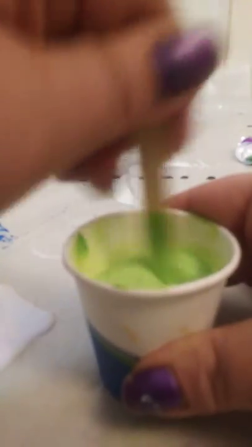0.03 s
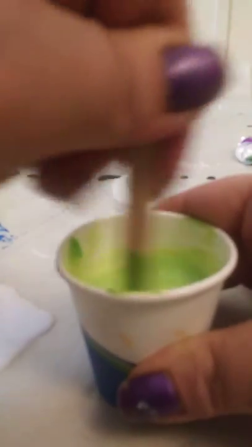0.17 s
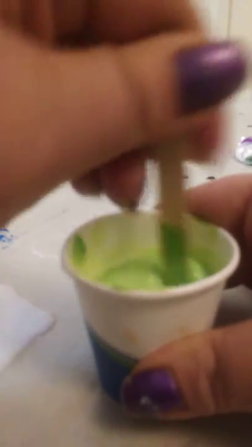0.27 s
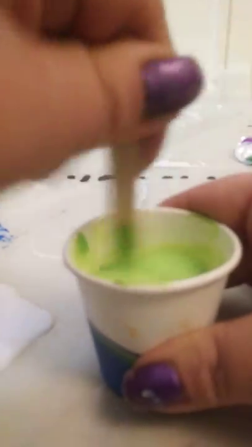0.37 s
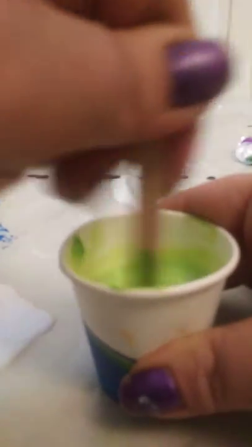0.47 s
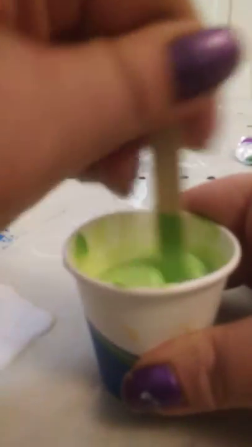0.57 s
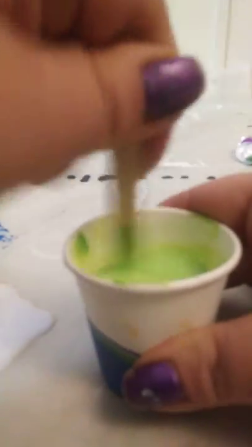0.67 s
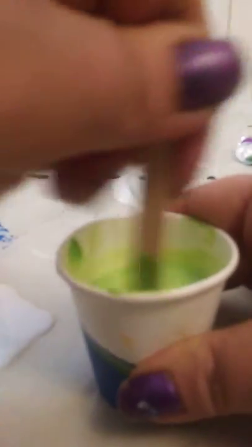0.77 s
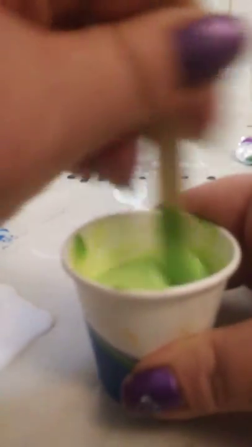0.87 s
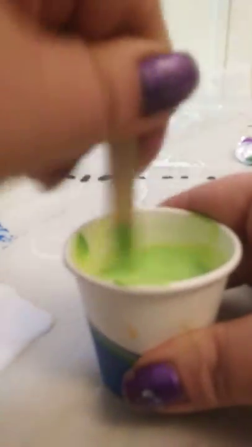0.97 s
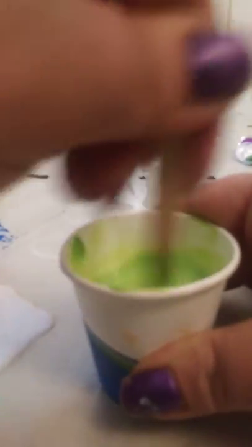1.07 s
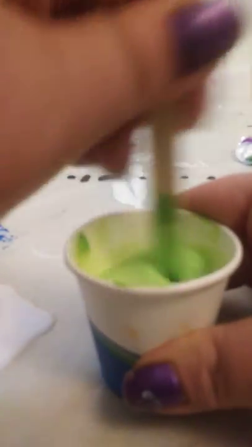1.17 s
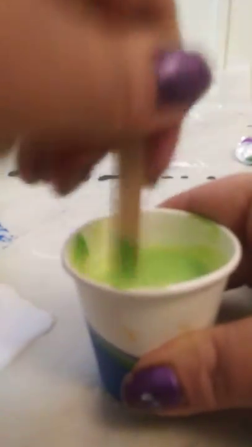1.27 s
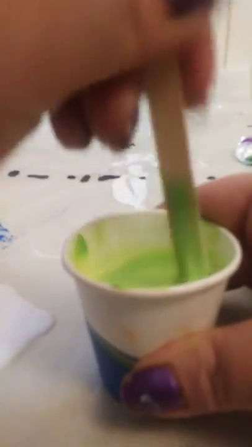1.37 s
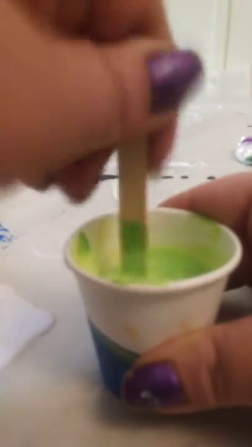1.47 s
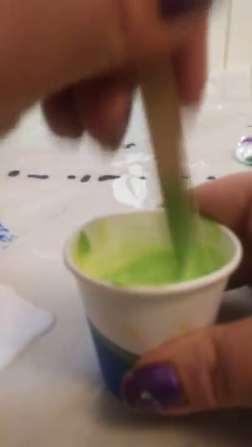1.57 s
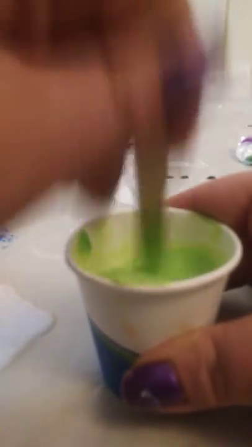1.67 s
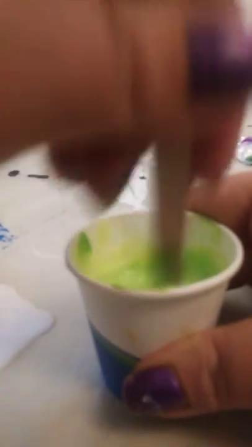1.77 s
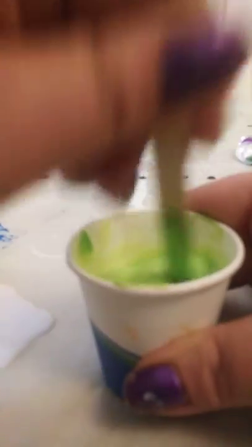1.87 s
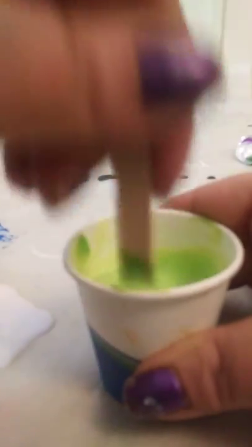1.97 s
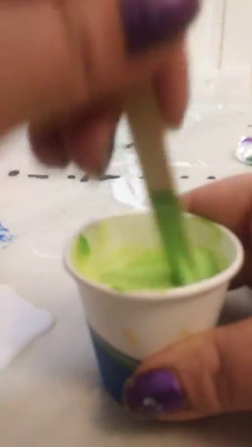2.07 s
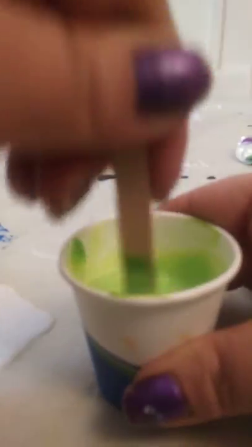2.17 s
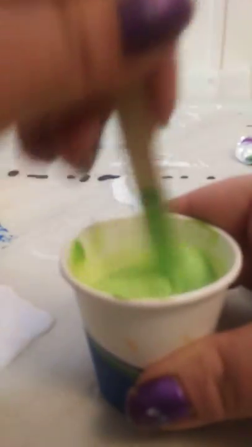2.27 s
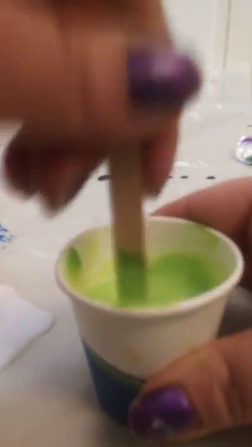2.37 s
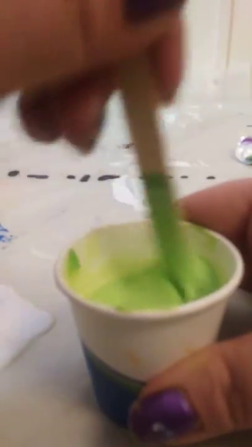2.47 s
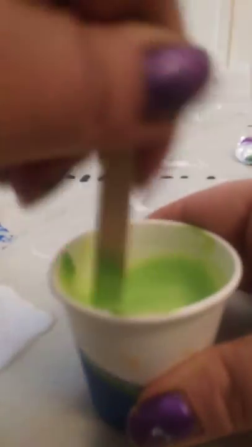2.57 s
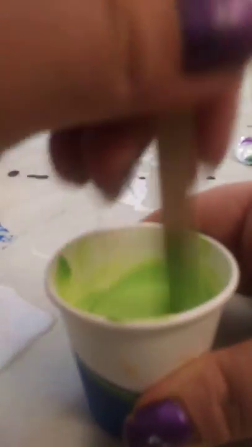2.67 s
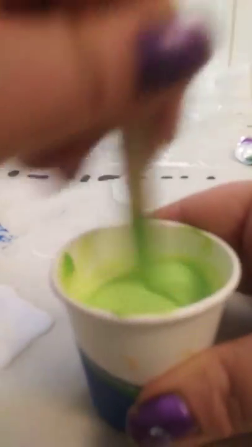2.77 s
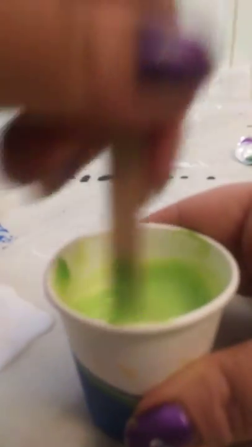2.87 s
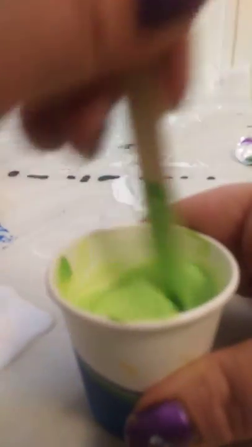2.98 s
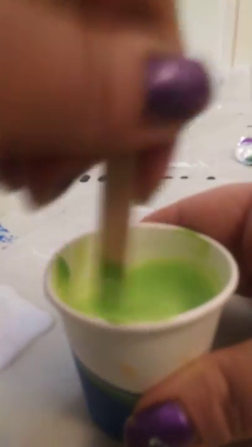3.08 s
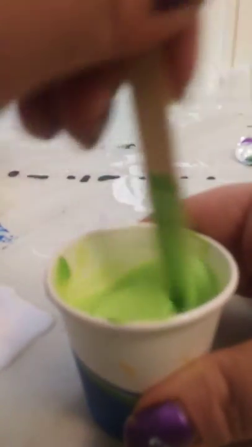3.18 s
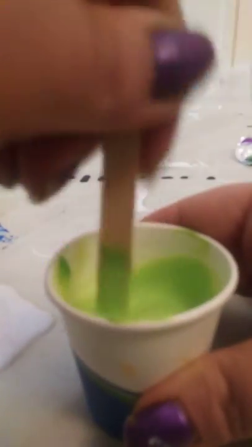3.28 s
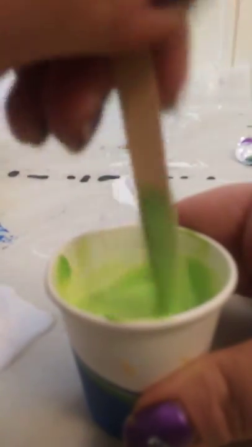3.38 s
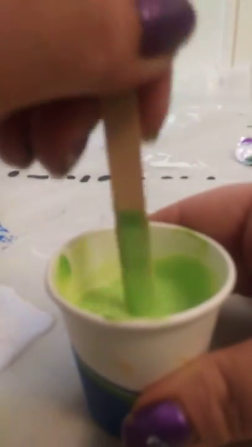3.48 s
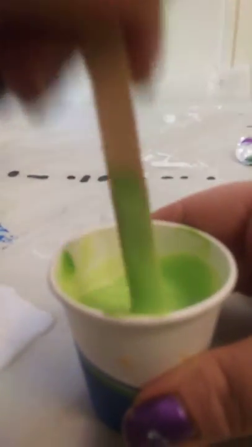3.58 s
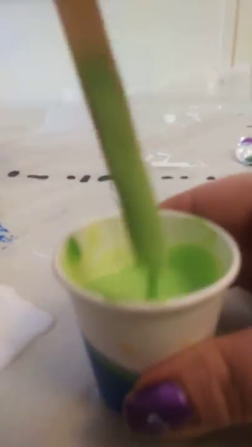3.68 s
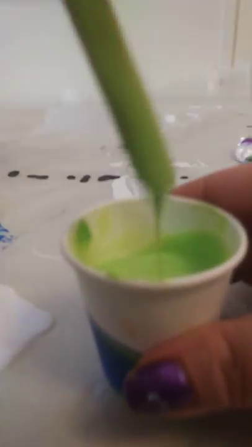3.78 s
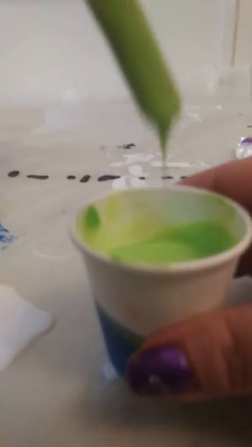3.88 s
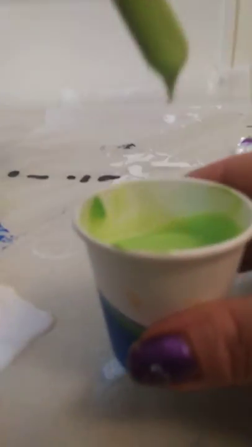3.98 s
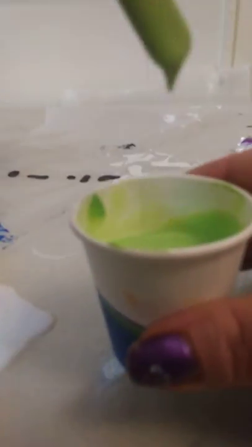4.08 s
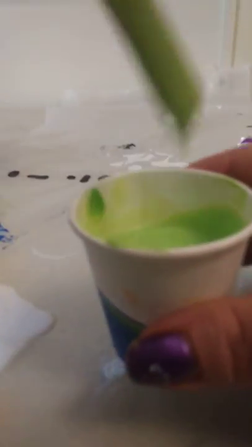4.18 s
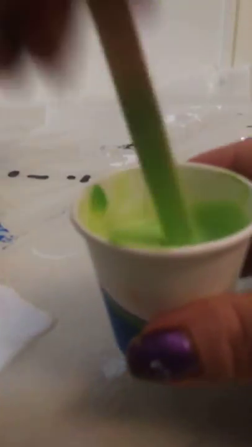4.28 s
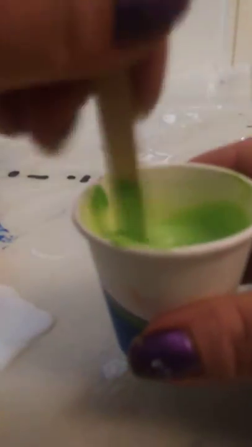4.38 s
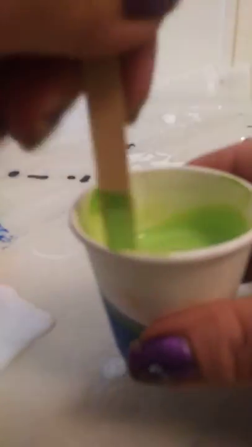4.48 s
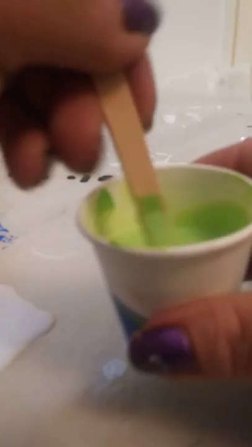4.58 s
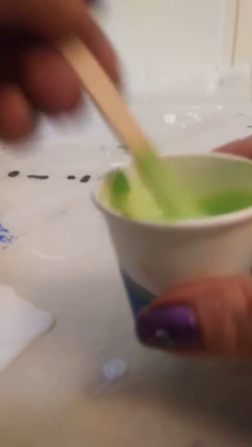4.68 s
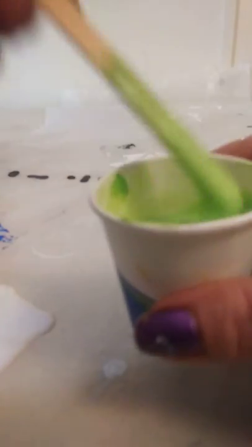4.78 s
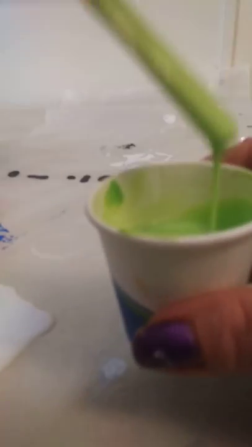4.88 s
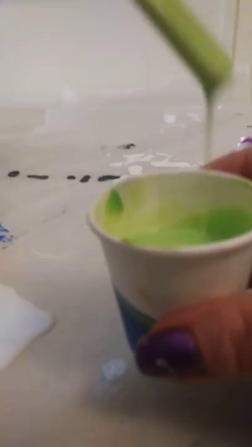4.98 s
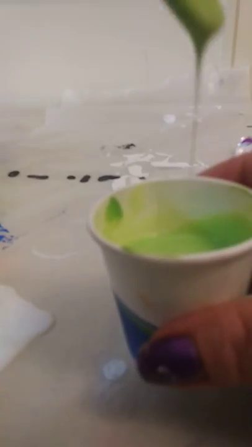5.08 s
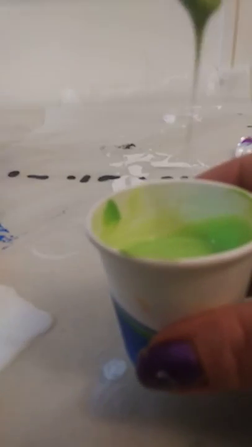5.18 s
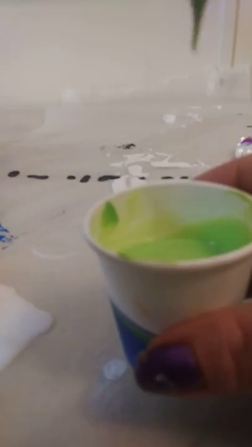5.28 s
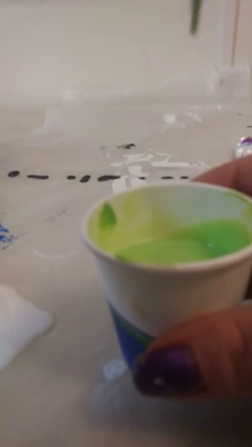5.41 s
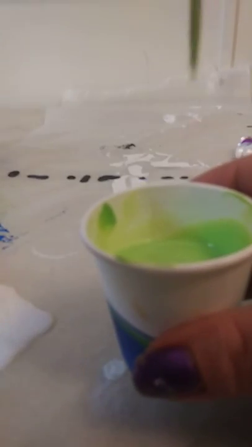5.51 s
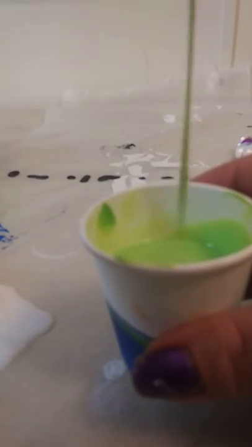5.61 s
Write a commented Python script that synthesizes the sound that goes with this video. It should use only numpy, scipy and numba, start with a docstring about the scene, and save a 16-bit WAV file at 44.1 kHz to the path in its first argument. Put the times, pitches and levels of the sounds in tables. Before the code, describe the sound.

Rapid, uneven scratching of wood on waxy paper, several strokes each second, with papery thumps as the stick hits the cup. Soft sticky crackle lies beneath. The stirring stops after three seconds; a weak rasp follows around four and a half, then only faint taps and a low steady room hush. Close, dry, mono, little bass.

```python
"""In a quiet room, close to the microphone, a wooden stick stirs thick paint in a small paper cup.
Friction, built from dense random slips, grates along the wall and bites, driving the ring of stick, wall and bottom.
Knocks are short bursts through the same stick and wall, each with a low thump of the whole cup.
The paint crackles and plops as decaying sines over a soft smear; later the stick is wiped over the rim.
Fingers slide on the paper as filtered friction; reflections and steady room air surround it all."""
import sys
import numpy as np
from scipy import signal
from scipy.fft import rfft, irfft
from scipy.io import wavfile
from scipy.ndimage import uniform_filter1d
from numba import njit

SR = 44100
rng = np.random.default_rng(int(sys.argv[2]) if len(sys.argv) > 2 else 0)


def file_out(sig):
    """Save sig as 16-bit WAV at sys.argv[1]."""
    # one column per channel
    cols = np.atleast_2d(sig).T
    # limit, then scale
    lim = np.clip(cols, -1, 1)
    pcm = np.round(lim * 32767).astype(np.int16)
    wavfile.write(sys.argv[1], SR, pcm)


N = 249165
TIME = np.arange(N) / SR  # s
EDGE_S = 0.004  # rounding of the tip's contacts, s


# resonances of the cup's bottom: (frequency [Hz], width [Hz], relative level [dB])
BOTTOM_MODES = [(213, 50, -15.5), (317.7, 39, -1), (383, 15, 3), (458.6, 27, 4), (560, 22, -18.5)]
# spectrum of the tip's grit: (frequency [Hz], relative level [dB per Hz])
GRIT_SPECTRUM = [(400, -16), (900, -2), (2500, -2.5), (3600, 3), (4300, 3.5), (6000, 5), (7200, 2),
                 (8500, -3), (10500, -13), (13200, -18), (16000, -24.5)]


def stirring(stick, grit, side, base, judder_db=1.63, judder_hz=170, bend=0.031,
             sheen_db=3.0, sheen_growth=1.87):
    """Juddering friction of the tip rings the wood and the wall, rasps, and rumbles in the bottom."""
    judder = unit(undb(judder_db * walk(judder_hz)))
    # the tip and the edge of the stick catch on different fibres
    tip = judder * friction(slips_per_s=1500, spread_db=-0.5, smooth=0.37)
    edge = judder * friction(slips_per_s=2400, spread_db=1.5, smooth=0.58)
    tone = wood(tip, TIME, bend * walk(40)) * stick
    rasp = unit(colour(edge, GRIT_SPECTRUM)) * grit
    # hard bites make the slips sharper: the very top grows faster than the rest
    top = cut(ring(tip, [(13230, 2240, 0)]), 12000, "high", order=4)
    sheen = unit(top) * undb(sheen_db) * np.sqrt(stick * grit) ** sheen_growth
    paper = wall(tip * side) / np.std(wall(tip))
    rumble = ring(edge * base, BOTTOM_MODES) / np.std(ring(edge, BOTTOM_MODES))
    return tone + rasp + sheen + paper + cut(rumble, 800, "low")


def drive(ring_db=-2, grit_db=-15, grit_growth=0.76, wall_db=-22, wall_growth=0.56):
    """Gains of stick, grit, wall and bottom: a bite rings the stick; the soft paper yields and gains far less."""
    grit, side, base = sliding()
    bite = biting()
    stick = np.hypot(bite, undb(ring_db) * grit)
    bitten_grit = np.hypot(grit, undb(grit_db) * bite ** grit_growth)
    bitten_side = np.hypot(side, undb(wall_db) * bite ** wall_growth)
    return stick, bitten_grit, bitten_side, base


# the tip slides along the cup between two skips, with starting levels:
# (start [s], length [s], grit level [dB], wall level [dB], bottom level [dB])
SLIDE_CONTACTS = [(0.005, 0.11, -38, -39.5, -46), (0.13, 0.11, -37, -39, -44),
                  (0.243, 0.13, -42, -39, -49.5), (0.385, 0.14, -36.5, -37, -44),
                  (0.53, 0.15, -42, -39.5, -48), (0.706, 0.11, -38.5, -37.5, -41.5),
                  (0.824, 0.17, -40.5, -37.5, -48), (1.014, 0.092, -35.5, -34, -39.5),
                  (1.115, .17, -39, -37, -48), (1.305, 0.17, -39, -40, -46.5),
                  (1.551, 0.014, -31.5, -45.5, -39), (1.6, 0.13, -40, -40, -51),
                  (1.762, 0.1, -39.5, -36.5, -43), (1.872, 0.086, -40, -37.5, -48),
                  (1.986, 0.037, -35.5, -35, -40), (2.031, 0.046, -49.5, -44, -43),
                  (2.121, 0.036, -44, -47, -45), (2.212, 0.031, -40, -40, -39.5),
                  (2.311, 0.028, -42.5, -51, -47.5), (2.345, .033, -57, -51, -56),
                  (2.4, .034, -43.5, -38.5, -41), (2.437, 0.054, -55, -45.5, -44),
                  (2.497, 0.081, -42, -45, -56), (2.583, 0.11, -39, -40.5, -47),
                  (2.702, 0.16, -41.5, -40.5, -51.5), (2.858, 0.068, -39.5, -38, -41),
                  (2.926, 0.15, -39.5, -43, -50), (3.082, 0.076, -39, -39, -51),
                  (3.174, 0.015, -42, -55, -54), (3.211, 0.04, -39.5, -41, -51.5)]


def sliding(sag_db=2):
    """The pressure eases over each slide; returns the gains that drive grit, wall and bottom."""
    starts, lengths, *parts = np.transpose(SLIDE_CONTACTS)
    gains = []
    for levels in parts:
        contacts = [press(*row, fade_db=sag_db) for row in zip(starts, lengths, levels)]
        gains.append(soften(sum(contacts), EDGE_S))
    return gains


# the tip bites into the paper and the stick rings: (start [s], rise [s], length [s], level before fading [dB])
BITE_CONTACTS = [(0.02, 0.01, 0.027, -28), (0.09, 0.012, 0.02, -33), (0.132, 0.0032, 0.066, -25),
                 (0.19, .005, 0.053, -36), (0.25, 0.016, 0.058, -29.5), (0.359, 0.0027, 0.011, -22),
                 (0.384, 0.0045, 0.012, -22.5), (0.402, 0.0029, 0.081, -26), (0.534, .003, 0.042, -27),
                 (0.645, 0.024, 0.025, -35), (0.705, 0.0027, 0.02, -27.5), (0.719, 0.0018, 0.05, -23.5),
                 (0.838, 0.011, 0.046, -32), (0.96, 0.024, 0.037, -34.5), (1.017, 0.0041, 0.049, -23),
                 (1.13, 0.012, .026, -26), (1.245, 0.0078, 0.027, -31.5), (1.307, 0.0046, 0.026, -18),
                 (1.395, .015, 0.034, -30), (1.45, 0.05, 0.051, -32.5), (1.544, 0.0025, 0.021, -21),
                 (1.612, 0.016, 0.034, -32), (1.69, 0.017, 0.043, -37.5), (1.762, 0.0024, 0.028, -24),
                 (1.835, 0.013, 0.037, -32.5), (1.983, 0.0074, 0.038, -28), (2.138, 0.01, 0.015, -39),
                 (2.213, .004, 0.022, -29), (2.33, 0.012, .014, -41.5), (2.41, 0.0067, .026, -25.5),
                 (2.464, 0.0026, 0.013, -36.5), (2.497, 0.0018, 0.0099, -29), (2.535, 0.042, 0.12, -37.5),
                 (2.712, 0.013, 0.04, -30.5), (2.81, 0.097, 0.11, -29.5), (2.975, .012, 0.019, -30.5),
                 (3.03, 0.023, 0.047, -33.5), (3.09, 0.03, 0.061, -34), (3.252, .005, 0.0061, -29.5)]


def biting(fade_db=8):
    """Each bite builds up, then dies down by fade_db before it lets go."""
    return swells(BITE_CONTACTS, fade_db, EDGE_S)


# the hold on the stick shifts its ring: (time [s], ring frequency [Hz])
GRIP_RING = [(0, 5050), (0.7, 5120), (1.3, 5150), (1.8, 4940), (2.4, 5100), (2.6, 5000), (2.8, 4700),
             (2.95, 4870), (3.3, 4840)]


def wood(force, times, bend=0, width_hz=665.0):
    """The stick's one strong ring is a moving resonance, applied twice and bent a little by the contact."""
    centre = np.interp(times, *np.transpose(GRIP_RING)) * np.exp(np.clip(bend, -0.15, 0.15))
    once = sweep(force, centre, width_hz)  # width_hz holds for each pass
    return unit(sweep(once, centre, width_hz))


# resonances of the paper wall: (frequency [Hz], width [Hz], relative level [dB])
WALL_MODES = [(610, 25.7, 2.5), (705, 34.3, 4), (763.3, 39, 4), (1045, 80, -3.5), (1117, 67, -8),
              (1541, 82, -4), (2050, 165, -8), (3100, 240, -5.5)]


def wall(force):
    """The paper wall and the air inside it resonate in a middle band."""
    return cut(cut(ring(force, WALL_MODES), 260, "high"), 2800, "low")


def friction(slips_per_s, spread_db, smooth):
    """Fibres catch and let go: dense slips of uneven size over a smooth rub, echoed in the cup."""
    sizes = undb(spread_db * np.clip(rng.standard_normal(N), -2, 2))
    slips = (rng.random(N) < slips_per_s / SR) * rng.choice([-1, 1], N) * sizes
    return echo(unit(slips) + smooth * rng.standard_normal(N))


def echo(force, depth=0.33, lag_s=0.00085, wander=0.3):
    """The far wall of the cup answers after a lag that wanders, so the colour shifts."""
    lag = lag_s * np.exp(wander * np.clip(walk(14), -2, 2))
    reflection = np.interp(np.arange(N) - np.round(lag * SR), np.arange(N), force)
    return unit(force + depth * reflection)


# the stick knocks the cup as it skips, or a finger taps it lightly; levels before the trims of knocks():
# (time [s], bottom level [dB], wall level [dB], stick level [dB], centre of the thump [Hz])
KNOCK_EVENTS = [(0.105, -24, -52, -46, 665), (0.119, -28, -48, -64, 620), (0.232, -34, -52, -37, 800),
                (0.404, -34.5, -52, -31, 730), (0.666, -32, -59, -58, 605), (0.706, -47, -36.5, -30.5, 716),
                (0.995, -29, -56, -58, 616), (1.102, -37, -58, -53, 735), (1.277, -24, -38, -39.5, 460),
                (1.335, -30.5, -34.5, -32, 417), (1.349, -36, -46, -50, 320), (1.515, -21, -36.5, -31, 493),
                (1.593, -34.5, -35, -49, 462), (1.671, -36.5, -36.5, -35, 576),
                (1.74, -24, -33.5, -35, 480), (1.797, -27.5, -33, -46, 820), (1.813, -27.5, -44, -55, 317),
                (1.968, -29.5, -37.5, -35, 480), (2.113, -36, -32.5, -33.5, 604),
                (2.191, -21.5, -33, -29.5, 450), (2.254, -43, -37, -33, 557), (2.308, -35, -32, -38.5, 835),
                (2.377, -21.5, -34.5, -32, 790), (2.387, -27, -38.5, -52, 400),
                (2.496, -55, -37.5, -33, 770), (2.637, -53, -39.5, -39, 700),
                (2.873, -33.5, -36.5, -31, 780), (2.931, -55, -38.5, -39, 700), (2.984, -66, -40, -32, 780),
                (3.109, -39.5, -40, -41, 485), (3.171, -62, -41, -44, 770), (3.205, -60, -56, -49, 700),
                (3.211, -46, -38, -38, 598), (3.359, -64.5, -53, -49, 807), (3.388, -54.5, -51, -51.5, 585),
                (3.399, -60, -54.5, -55, 590), (3.929, -68, -73, -62, 856), (4.149, -66, -63.5, -71, 697),
                (4.363, -57.5, -60.5, -77.5, 466), (4.432, -60, -49, -52, 774), (4.44, -70, -63, -54, 497),
                (5.23, -66, -74, -69, 466), (5.447, -63, -75.5, -81, 409)]
# resonances of the whole cup when knocked: (frequency [Hz], width [Hz], relative level [dB])
THUMP_MODES = [(130.6, 200, -16.5), (264, 96, -3), (361, 50, -0.5), (449, 27, 2.5), (654, 100, 1),
               (795, 138, 1.5), (1052, 60, 7)]


def knocks(thump_db=0, wall_db=2, stick_db=2, grit=0.38, crack=0.43, crunch_s=0.0012, push_s=0.00047,
           lag_s=0.00364, recoil=0.62, recoil_s=0.0043, width_hz=530.0):
    """Wood crunches briefly on paper; then the paint-laden bottom gives way and springs back."""
    out, t = np.zeros(N), TIME[:SR // 8]
    burst = (t / crunch_s) ** 2 * np.exp(-t / crunch_s)
    grains = rng.standard_normal((len(KNOCK_EVENTS), len(t)))
    for (s, low, mid, high, hz), grain in zip(KNOCK_EVENTS, grains):
        crunch = grain * burst
        push = np.exp(-((t - lag_s) / push_s) ** 2)
        # the spring-back comes a little earlier or later each time
        back_s = lag_s + recoil_s * (1 + 0.3 * grain[0])
        back = np.exp(-((t - back_s) / push_s) ** 2)
        # the spot that is struck decides which modes speak most
        blow = sweep(recoil * back - push, np.full(len(t), float(hz)), width_hz)
        add(out, s, strongest(ring(blow, THUMP_MODES), low + thump_db))
        snap = unit(wall(crunch)) + crack * unit(cut(crunch, 2300, "low"))
        add(out, s, strongest(cut(snap, 1080, "high"), mid + wall_db))
        # only firm knocks set the wood ringing; light taps just tick
        firm = np.clip((high + 55) / 20, 0, 1)
        tick = firm * wood(crunch, s + t) + grit * unit(colour(crunch, GRIT_SPECTRUM))
        add(out, s, strongest(tick, high + stick_db))
    return out


def smear(level_db=-57, grit=1.0, swell_db=2):
    """The stick shears the paint softly until the last slide ends, even when it is clear of the wall."""
    swell = undb(swell_db * np.clip(walk(61), -2, 2))
    force = friction(slips_per_s=1200, spread_db=7, smooth=0.67) * swell
    start, length, *_ = SLIDE_CONTACTS[-1]
    sound = unit(unit(wall(force)) + grit * unit(colour(force, GRIT_SPECTRUM)))
    return sound * undb(level_db) * (TIME < start + length)


def crackle(shear, gain_db=-10.0, per_s=420, spread_db=5, cycles=5, low_hz=700, high_hz=11000, tilt_db=-2):
    """Tiny air pockets tear open behind the tip: decaying sines, each with a pitch of its own."""
    out, t = np.zeros(N), TIME[:SR // 50]
    for when, pitch, size in rng.random((int(per_s * N / SR), 3)):
        hz = low_hz * (high_hz / low_hz) ** pitch
        # a few pockets are much louder; tilt_db is per octave
        db = spread_db * min(-np.log(1 - size), 3) + tilt_db * np.log2(hz / low_hz)
        pop = np.sin(2 * np.pi * hz * t) * np.exp(-hz * t / cycles)
        add(out, when * N / SR, undb(db) * pop)
    return unit(out) * shear * undb(gain_db)


# air pockets open in the paint: (time [s], level before gain_db [dB], starting pitch [Hz])
PLOP_EVENTS = [(2.593, -27, 1007), (3.088, -27.5, 1106), (3.647, -44, 520), (3.722, -57.5, 510),
               (3.756, -44, 535), (3.825, -51.5, 480)]


def plops(gain_db=-3, decay_s=0.0059, phase_rise_per_s=4, wet=0.34):
    """Small air pockets burst in thick paint: a short sine, rising a little, with a wet noise."""
    out, t = np.zeros(N), TIME[:SR // 20]
    grains = rng.standard_normal((len(PLOP_EVENTS), len(t)))
    for (s, db, hz), grain in zip(PLOP_EVENTS, grains):
        # the pitch itself rises twice as fast as this phase factor
        bubble = np.sin(2 * np.pi * hz * t * (1 + phase_rise_per_s * t))
        squelch = unit(ring(grain, [(hz, hz / 2, 0)]))
        add(out, s, strongest((bubble + wet * squelch) * np.exp(-t / decay_s), db + gain_db))
    return out


# spectrum of the rim: (frequency [Hz], relative level [dB per Hz])
RIM_SPECTRUM = [(200, -23.5), (450, -10.5), (900, -14.5), (1370, -19.5), (2020, -6.5), (2500, -10.5),
                (3130, -5), (3690, -13), (4950, 0.5), (5800, -6.5), (7000, -9), (11700, -29.5),
                (14100, -31), (16000, -38)]
# the rim catches on the wood: (start [s], rise [s], length [s], level before fading [dB])
RIM_CATCHES = [(4.457, 0.0091, 0.033, -37.5), (4.484, 0.012, 0.035, -38.5), (4.593, 0.0036, 0.0069, -33.5),
               (4.608, 0.0074, 0.02, -33.5), (4.64, .017, 0.029, -37), (4.7, 0.02, 0.052, -40)]


def wiping(start_s=4.457, length_s=0.299, level_db=-45.5, catch_fade_db=8, judder_db=2, edge_s=0.0047):
    """The flat of the stick rasps once over the stiff rolled rim with even pressure, catching as it goes."""
    judder = unit(undb(judder_db * walk(110)))
    force = judder * friction(slips_per_s=2400, spread_db=3.5, smooth=1.0)
    draw = soften(press(start_s, length_s, level_db), edge_s)
    catches = swells(RIM_CATCHES, catch_fade_db, edge_s)
    return unit(colour(force, RIM_SPECTRUM)) * np.hypot(draw, catches)


# spectrum of skin on paper: (frequency [Hz], relative level [dB per Hz])
SKIN_SPECTRUM = [(150, -32), (300, -1.5), (480, -1), (800, 1), (1300, -12.5), (2800, -13), (4000, -12.5),
                 (6500, -15), (9000, -31.5), (16000, -45)]
# fingers shift on the cup: (start [s], rise [s], length [s], level before fading [dB])
FINGER_SHIFTS = [(3.39, 0.23, .43, -55.5), (3.83, .01, 0.15, -59.5), (4.76, 0.0067, 0.25, -60.5),
                 (4.98, 0.17, 0.27, -63.5)]


def fingers(fade_db=11, edge_s=0.04):
    """Skin slides faintly on the paper: friction coloured dark."""
    force = friction(slips_per_s=1500, spread_db=1.0, smooth=0.78)
    return unit(colour(force, SKIN_SPECTRUM)) * swells(FINGER_SHIFTS, fade_db, edge_s)


def room(x, near_db=-17, near_t60_s=0.14, far_db=-23, far_t60_s=0.95, dull_hz=1800):
    """Quick bright reflections from the hands and table, then a faint dull tail from the walls."""
    t = TIME[:SR // 2]
    near, far = (rng.standard_normal(len(t)) * undb(-60 * t / t60) * (t > 0.003)
                 for t60 in (near_t60_s, far_t60_s))
    near_tail = undb(near_db) * near / np.linalg.norm(near)
    far_tail = undb(far_db) * cut(far / np.linalg.norm(far), dull_hz, "low", order=1)
    return x + signal.fftconvolve(x, near_tail + far_tail)[:N]


# spectrum of the room's air: (frequency [Hz], relative level [dB per Hz])
AIR_SPECTRUM = [(35, -40.5), (60, -32), (139, -33), (172, -16.5), (301, -10), (330, -3), (371, -8),
                (458, 1.5), (553, -7.5), (715, -9), (1010, -13), (1780, -14.5), (2520, -17), (3340, -20),
                (16000, -27)]


def room_air(level_db=-63):
    """The low, steady rush of a quiet room is coloured noise."""
    return unit(colour(rng.standard_normal(N), AIR_SPECTRUM)) * undb(level_db)


def press(start, length, db, rise=0, fade_db=0):
    """Gain of one contact: it rises to its level, fades steadily and lets go."""
    gain, t = np.zeros(N), np.arange(int(length * SR)) / SR
    spent = np.maximum(t - rise, 0) / max(length - rise, EDGE_S)
    add(gain, start, np.minimum(t / max(rise, 1 / SR), 1) * undb(db - fade_db * spent))
    return gain


def soften(gain, edge_s, release=0.15, release_s=0.0014):
    """Round the edges of a contact; a share clings on briefly as it lets go."""
    size = max(int(edge_s * SR), 1)
    gain = np.convolve(gain, np.ones(size) / size, "same")
    keep = np.exp(-1 / (release_s * SR))
    clinging = signal.lfilter([1 - keep], [1, -keep], gain)
    return gain + release * (clinging - gain)


def swells(rows, fade_db, edge_s):
    """Gain over time of contacts that each build up and die down."""
    return soften(sum(press(s, length, db, rise, fade_db) for s, rise, length, db in rows), edge_s)


def ring(x, modes):
    """Resonances side by side, neighbours moving in opposite directions."""
    out = 0
    for k, (hz, width, db) in enumerate(modes):
        mode = signal.lfilter(*signal.iirpeak(hz, hz / width, fs=SR), x)
        out = out + (-1) ** k * undb(db) * mode
    return out


@njit
def sweep(x, hz, width):
    """Band-pass whose centre moves: a state-variable filter."""
    y, band, low = np.empty(len(x)), 0., 0.
    for i in range(len(x)):
        g, k = np.tan(np.pi * hz[i] / SR), width / hz[i]
        v = (band + g * (x[i] - low)) / (1 + g * (g + k))
        band, low, y[i] = 2 * v - band, low + 2 * g * v, k * v
    return y


def colour(x, points, size=2048):
    """Causal minimum-phase filter with the given (frequency [Hz], level [dB]) spectrum."""
    hz, db = np.transpose(points)
    bins = np.log(np.fft.rfftfreq(size, 1 / SR) + 1)
    log_gain = np.log(undb(np.interp(bins, np.log(hz), db)))
    # folding the cepstrum forward in time makes the filter causal
    cepstrum = irfft(log_gain)
    cepstrum[1:size // 2] *= 2
    cepstrum[size // 2 + 1:] = 0
    return signal.fftconvolve(x, irfft(np.exp(rfft(cepstrum))))[:len(x)]


def cut(x, hz, kind, order=2):
    """High-pass or low-pass."""
    return signal.sosfilt(signal.butter(order, hz, kind, fs=SR, output="sos"), x)


def walk(hz):
    """Smooth chance that heads for a new random value hz times a second; rms 1."""
    knots = rng.standard_normal(N // 10)
    return unit(np.interp(TIME * hz, np.arange(len(knots)), knots))


def strongest(x, db, size=256):
    """Scale a short sound so that its loudest few milliseconds have the given level."""
    return x * undb(db) / np.sqrt(uniform_filter1d(x ** 2, size).max())


def add(track, s, sound):
    """Mix a short sound in at time s."""
    i = int(s * SR)
    track[i:i + len(sound)] += sound[:N - i]


def unit(x):
    """Scale to rms 1."""
    return x / np.sqrt(np.mean(x ** 2))


def undb(db):
    """Decibels to gain."""
    return 10 ** (np.asarray(db) / 20)


def scene():
    """Stick, paint and fingers sound through the small cup into the room, with little bass below about 270 Hz."""
    stick, grit, side, base = drive()
    paint = smear() + crackle(np.sqrt(stick * side)) + plops()
    contacts = stirring(stick, grit, side, base) + knocks() + wiping() + fingers()
    sources = cut(contacts + paint, 268, "high")
    return (room(sources) + room_air())[None]


def record(dry, top_hz=15900):
    """The recorder cuts the top with a steep low-pass."""
    return signal.sosfilt(signal.ellip(10, 0.2, 70, top_hz, fs=SR, output="sos"), dry)


dry = scene()
out = record(dry)
file_out(out)
```